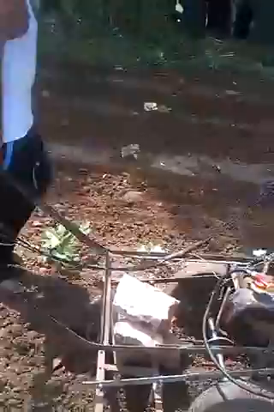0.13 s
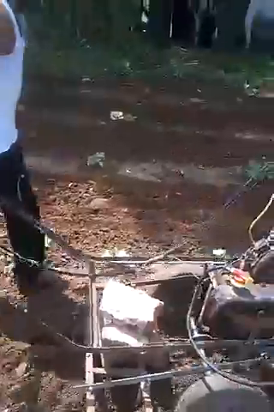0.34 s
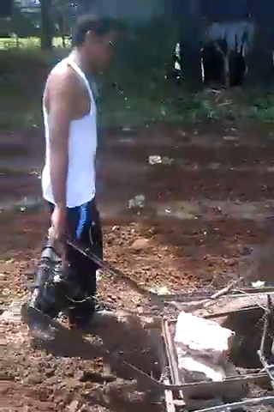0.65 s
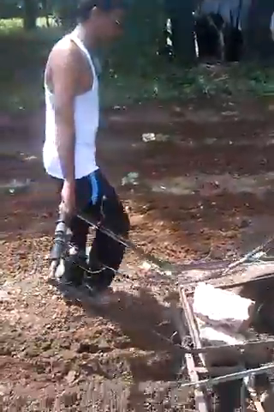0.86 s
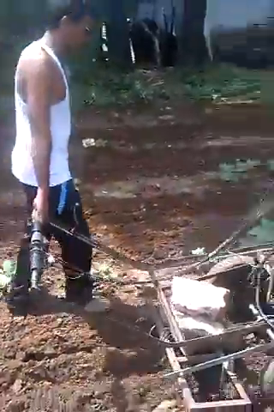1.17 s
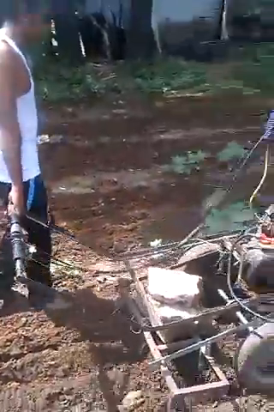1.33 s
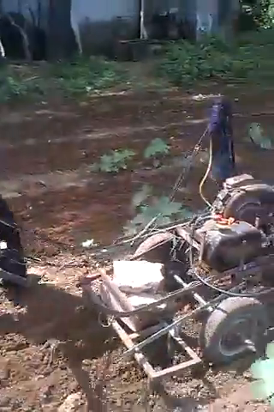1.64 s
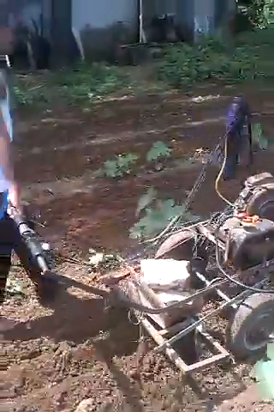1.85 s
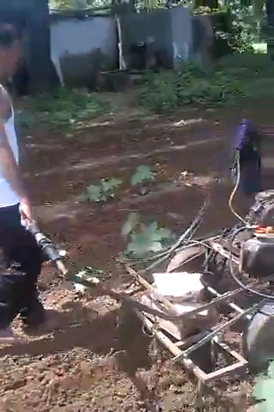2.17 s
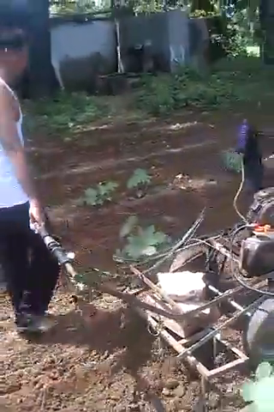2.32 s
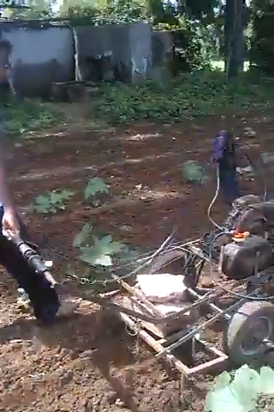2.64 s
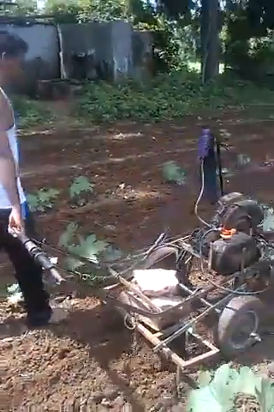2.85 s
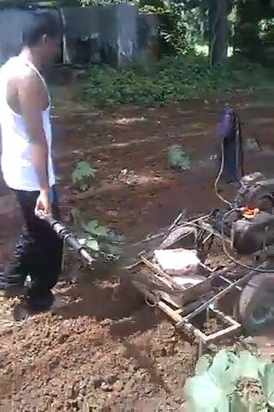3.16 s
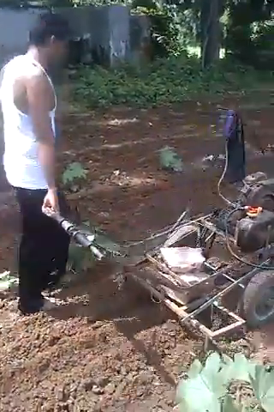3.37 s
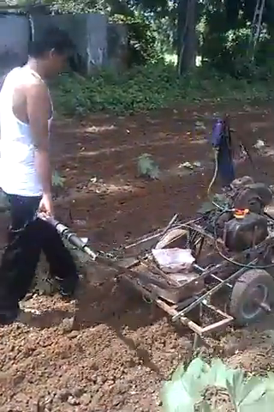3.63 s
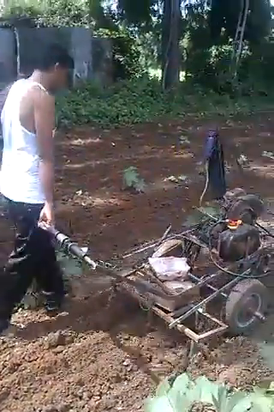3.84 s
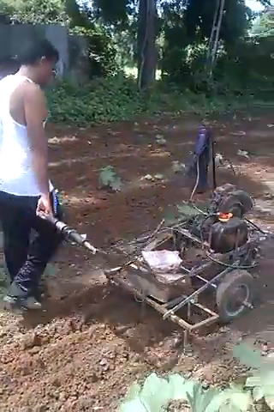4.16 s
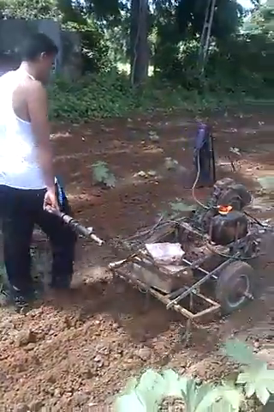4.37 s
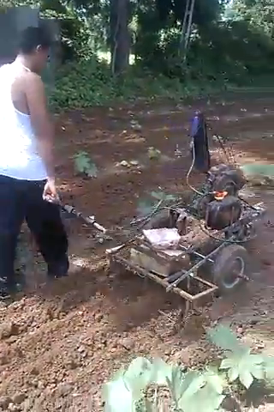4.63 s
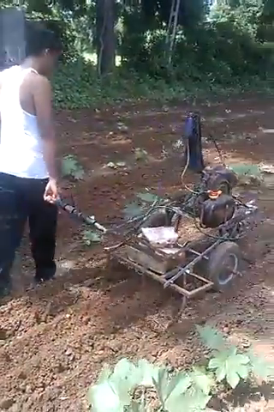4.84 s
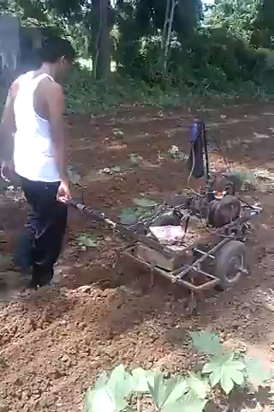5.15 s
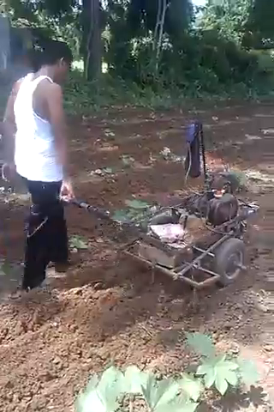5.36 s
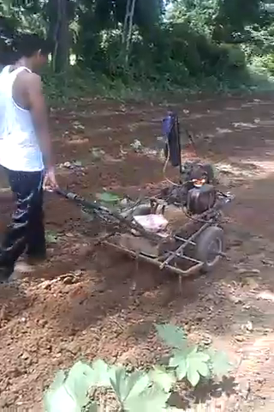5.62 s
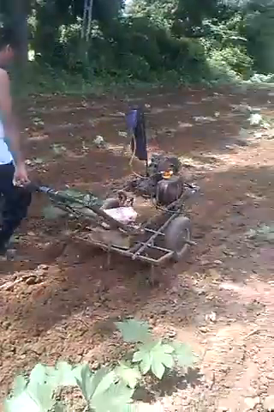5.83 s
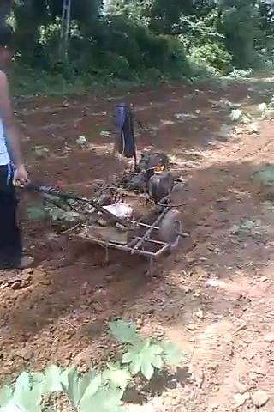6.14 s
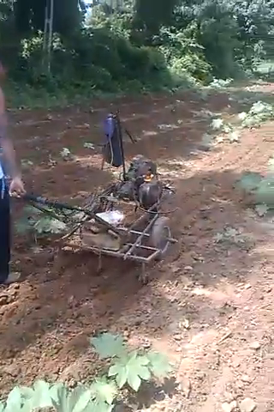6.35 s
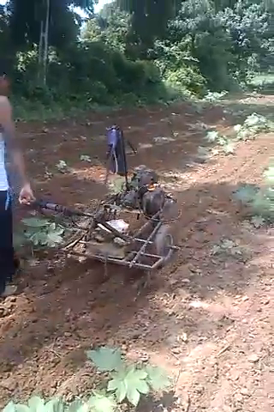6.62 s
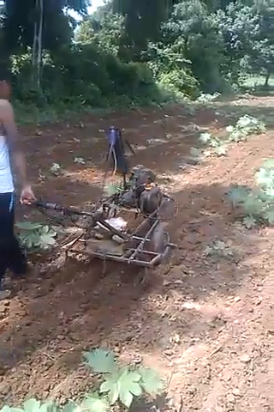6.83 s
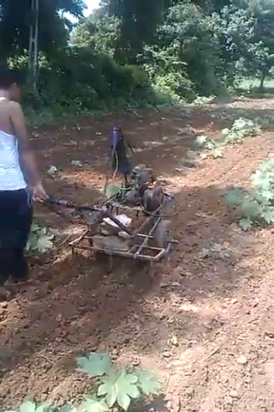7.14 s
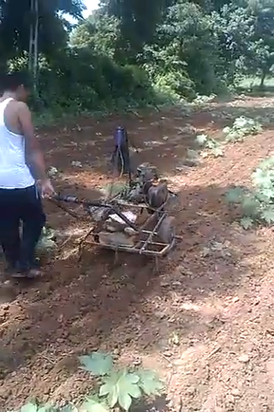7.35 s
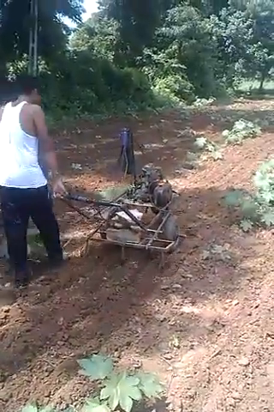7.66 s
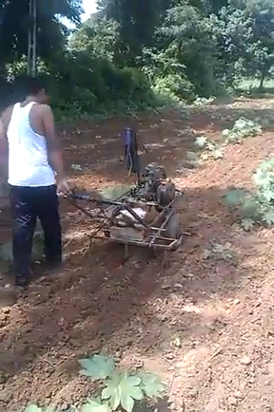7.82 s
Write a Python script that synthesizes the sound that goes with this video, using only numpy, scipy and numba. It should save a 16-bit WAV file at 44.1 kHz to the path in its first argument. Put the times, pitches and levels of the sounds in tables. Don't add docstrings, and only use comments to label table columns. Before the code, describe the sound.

A small single-cylinder engine chugs and clatters outdoors, then a finger rubs over the microphone with a loud thump, leaving it muffled and faint.

```python
import sys
import numpy as np
from scipy import signal
from scipy.fft import rfft, irfft, next_fast_len
from scipy.io import wavfile
from scipy.ndimage import uniform_filter1d
from numba import njit

SR = 44100
rng = np.random.default_rng(int(sys.argv[2]) if len(sys.argv) > 2 else 0)


def generate_wav(sig):
    pcm = np.round(np.clip(np.atleast_2d(sig).T, -1, 1) * 32767).astype(np.int16)
    wavfile.write(sys.argv[1], SR, pcm)


def linear_from_db(decibels):
    return 10 ** (np.asarray(decibels, float) / 20)


N = 352355
T = np.arange(N) / SR

# time_s, turned_cycles
CRANK = [(0.0, 0.56), (0.2, 4.48), (0.6, 12.8), (1.2, 25.68), (1.6, 33.88), (2.2, 47.18), (2.6, 55.5),
         (3.6, 76.15), (4.0, 84.85), (4.2, 89.47), (4.6, 97.75), (5.0, 106.71), (5.4, 114.97),
         (5.6, 119.31), (6.0, 126.91), (6.8, 144.23), (7.6, 160.89), (7.99, 169.03)]
GULP_AT, BANG_AT, TICK_AT, PUSH_AT = .55, .93, .5, .0
# time_s, pitch_hz
HONK_PITCH = [(0, 411), (1.5, 416), (2.4, 416.5), (3.5, 419), (6, 402), (8, 420)]
# time_s, pitch_hz
PIPE_PITCH = [(3.8, 312), (4.7, 314), (4.82, 324), (5.15, 304), (5.45, 318), (5.65, 304), (6.2, 312),
              (6.7, 308), (6.8, 316), (7.0, 304), (7.3, 316), (7.6, 308), (8, 310)]
PIPE_NOTE_SHARE = 1.1
HONK_DB, PIPE_DB, THUMP_DB = -28, -36.5, -34.5
TURN_DB_PER_S = -1.16
CLATTER_DB, DULL_DB = -28.5, -39.5
# frequency_hz, density_db
OPEN_COLOUR = [(280, -10.5), (480, 2.5), (532, -10), (902, -1), (1120, -5), (1440, -5), (1880, -15),
               (2050, -12), (2310, -17), (2830, -10.5), (4090, -15), (5650, -5), (9160, -29),
               (12300, -29.5), (16000, -39)]
# frequency_hz, density_db
COVERED_COLOUR = [(280, -40), (480, 1), (562, -2.5), (695, 6.5), (740, 7), (772, 2.5), (995, 0.5),
                  (1300, -12), (1410, -5.5), (2250, -33.5), (3250, -15), (3890, -26), (6000, -24.5),
                  (7800, -54), (13200, -120)]
# time_s, treble_gain_db
FACING = [(0, 4), (1.42, 2.5), (1.48, 6), (1.98, 6.5), (2.03, 4.5), (2.5, 5)]
# time_s, low_voice_loss_db
SEAL = [(0, 0.5), (2.57, 0), (2.62, -9), (2.69, -13), (2.86, -25.5), (2.98, -24.5), (3.4, -5), (3.8, -11),
        (4.3, -14.5), (5, -14.5), (8, -17.5)]
HONK_SEAL, THUMP_SEAL, DULL_SEAL = 1.29, 0.76, 0.88
SHUT_FROM_S, SHUT_S, SHUT_POWER = 2.42, 0.19, 0.57
SHUT_EDGE_HZ = 2140
# time_s, pitch_hz, level_db
LEAK = [
    (2.5, 1300, -26.5),
    (2.55, 1290, -50),
    (2.6, 1210, -50),
    (2.64, 1500, -42),
    (2.74, 1530, -44),
    (2.77, 1090, -48.5),
    (2.83, 1230, -41.5),
    (2.86, 1200, -57),
]
POCKET_FROM_S, POCKET_TO_S, POCKET_DB, POCKET_AFTER_DB = 3.38, 5.9, -26, -36

# time_s, buzz_hz, level_db (before overload)
SLIDES = [
    [(2.99, 60.4, -41), (3.04, 92, -12), (3.1, 157, -4), (3.115, 341, 8), (3.15, 463, 0.5),
     (3.175, 513, -9.5), (3.19, 700, -20.5), (3.225, 600, -22)],
    [(3.24, 700, -7), (3.285, 409, 0), (3.297, 514, -11.5), (3.31, 702.6, -36.5), (3.33, 500, -34),
     (3.44, 397, -43)],
]
# time_s, rumble_db, crackle_db
GRIP = [(0, -37, -38), (2.5, -38, -43), (2.69, -34.5, -61), (2.98, -38.5, -62.5), (3.3, -36.5, -44.5),
        (4, -40, -47), (5.1, -41.5, -53), (8, -39, -57.5)]
# centre_s, length_s, rumble_db, crackle_db
SHIFTS = [(.47, 0.36, -36, -35), (1.072, 0.065, -26, -32), (1.409, 0.047, -31, -26.5),
          (1.587, 0.21, -29, -32.5), (1.765, 0.061, -29, -25.5), (1.989, 0.094, -31, -33.5),
          (2.113, .06, -24.5, -48), (2.444, 0.071, -26, -41), (2.628, 0.063, -31.5, -32),
          (2.723, 0.14, -32, -58), (2.835, 0.068, -36, -36.5), (2.96, 0.11, -31.5, -60),
          (3.41, .12, -32.5, -29), (3.705, 0.25, -32, -36), (4.018, 0.14, -35.5, -36),
          (4.18, .06, -39, -40), (4.447, 0.092, -34.5, -49), (4.651, 0.18, -33.5, -45.5),
          (4.979, 0.055, -35.5, -57), (5.225, .1, -38, -64), (5.586, 0.045, -36, -36),
          (5.7, 0.1, -48, -40.5), (5.998, 0.054, -38.5, -44), (6.072, 0.054, -37, -47),
          (6.32, 0.036, -34.5, -55), (6.712, 0.21, -38, -49.5), (7.091, 0.037, -38.5, -48),
          (7.827, 0.034, -30, -54), (7.906, .14, -33.5, -45)]
# frequency_hz, density_db
RUMBLE_COLOUR = [(8.8, -57.5), (15, 1), (70, -7), (107, -14), (173, -22.5), (215, -25.5), (260, -34.5),
                 (340, -87), (570, -120)]
# start_s, length_s, level_db, pitch_hz
SCRAPES = [(1.51, 0.076, -34, 533), (2.614, 0.075, -37, 405), (2.81, 0.049, -49, 400),
           (3.328, 0.12, -29.5, 478), (3.597, 0.11, -33.5, 420), (3.7, 0.071, -55, 344),
           (3.95, 0.13, -41, 480), (4.165, 0.027, -38.5, 387), (4.651, 0.24, -49, 485),
           (5.55, .05, -36.5, 450), (5.678, 0.033, -38.5, 460), (6.057, 0.016, -46, 500),
           (6.229, 0.03, -42.5, 550), (6.382, 0.083, -48, 550), (6.657, 0.071, -50, 685),
           (7.877, 0.042, -37, 476), (7.902, 0.046, -37.5, 403)]
BRUSH_S, BRUSH_LENGTH_S, BRUSH_DB = 6.69, 0.023, -57
# time_s, peak_db, pitch_hz, direction
THUDS = [(0.365, -15, 293, -1), (0.43, -28, 290, -1), (0.53, -16, 179, 1), (1.074, -15.5, 157, -1),
         (1.417, -27, 166, 1), (1.531, -4, 308, 1), (1.568, -11.5, 317, -1), (1.6, -6.5, 367, -1),
         (1.623, -9.5, 393, -1), (1.638, -15, 298, 1), (1.763, -11, 216, 1), (2.094, -19, 132, 1),
         (3.58, -18, 312, -1), (3.632, -20, 339, -1), (3.653, -22.5, 105, -1), (3.964, -11.5, 200, -1),
         (4.026, -20, 200, 1), (4.058, -21, 222, -1), (4.422, -27, 91, 1), (4.464, -22, 104, -1),
         (4.665, -19, 103, -1), (5.563, -18, 175, -1), (6.062, -28, 157, -1), (6.239, -31, 213, -1),
         (6.751, -31, 119, -1), (7.096, -27, 98, -1), (7.82, -25.5, 141, -1), (7.887, -21.5, 157, 1),
         (7.933, -19, 135, 1), (7.955, -24, 134, 1)]
RING_S, FIRM_PER_DB = 0.022, 0.4
# centre_s, width_s, peak
PRESSES = [
    (2.665, .009, -.1),
    (2.942, .016, .13),
    (3.013, .003, .5),
    (3.027, .008, -.62),
    (3.051, .003, -.4),
]
# time_s, peak, pull_s, rebound_share
TICKS = [
    (3.3463, .1, .0002, .1),
    (3.3505, .58, .00022, .2),
    (3.4028, .47, .0004, .1),
    (3.4041, .5, .00008, .65),
    (3.41, .05, .00015, .1),
]

# frequency_hz, density_db
HISS_COLOUR = [(600, -4.5), (1500, 6), (4000, -2.5), (9000, -4.5), (15500, -7.5), (16000, -13.5)]
HISS_DB = -65
OVERLOAD = .72
GATE_EDGES_HZ = [2200, 3200, 4400, 5600, 6900, 8300, 9600, 11000, 12400, 13800, 15000, 15900]
GATE_DB, GATE_DB_PER_OCTAVE, RAGGED_DB, FAINT_DB = 2.2, 3.2, 1.2, -56
THIN_DB_PER_HZ, THIN_FROM_HZ, THIN_UNTIL_S = -84.5, 8000, 2.45


def unit(x):
    return x / np.sqrt(np.mean(x ** 2))


def along(table):
    s, *columns = np.transpose(table)
    return [np.interp(T, s, c) for c in columns]


def curves(table):
    table = np.array(table, float)
    silent = table[0, 1:] * 0 - 120
    before = np.r_[table[0, 0] - .02, silent]
    after = np.r_[table[-1, 0] + .02, silent]
    return along([before, *table, after])


def noise():
    return rng.standard_normal(N)


def walk(rate):
    k = int(SR / rate)
    held = np.repeat(rng.standard_normal(N // k + 1), k)
    return unit(uniform_filter1d(uniform_filter1d(held, k), k)[:N])


def colour(x, points, lo_hz, hi_hz):
    hz, db = np.transpose(points)
    size = next_fast_len(N)
    f = np.fft.rfftfreq(size, 1 / SR) + 1e-3
    gain_db = np.interp(np.log(f), np.log(hz), db, left=-120, right=-120)
    spectrum = rfft(x, size) * linear_from_db(gain_db)
    inside = (f > lo_hz) & (f < hi_hz)
    rms = np.sqrt(2 * np.sum(np.abs(spectrum[inside]) ** 2)) / N
    return irfft(spectrum, size)[:N] / rms


@njit
def svf(x, hz, width):
    y, b, l = np.empty(len(x)), 0., 0.
    for i in range(len(x)):
        g, k = np.tan(np.pi * hz[i] / SR), width[i] / hz[i]
        v = (b + g * (x[i] - l)) / (1 + g * (g + k))
        b, l, y[i] = 2 * v - b, l + 2 * g * v, k * v
    return y


def band(x, hz, width):
    return svf(x, np.clip(hz + 0 * T, 20, 16000), width + 0 * T)


def engine():
    cycles, = along(CRANK)
    seal_db, = along(SEAL)
    gap = np.clip(1 - (T - SHUT_FROM_S) / SHUT_S, 0, 1)
    out = intake_honk(cycles) * linear_from_db(HONK_DB + TURN_DB_PER_S * T + HONK_SEAL * seal_db)
    out += exhaust(cycles, seal_db)
    out += open_clatter(cycles, gap)
    out += covered_clatter(cycles) * (1 - gap) * linear_from_db(DULL_DB + DULL_SEAL * seal_db)
    return out + leak()


def stroke(cycles, start, rise, decay, scatter_db):
    turn, phase = np.divmod(cycles - start + 2, 1)
    size = linear_from_db(scatter_db * rng.standard_normal(400))[turn.astype(int)]
    return size * (1 - np.exp(-phase / rise)) * np.exp(-phase / decay)


def intake_honk(cycles):
    hz, = along(HONK_PITCH)
    turn, phase = np.divmod(cycles - GULP_AT + 2, 1)
    strength, detune = rng.standard_normal((400, 2))[turn.astype(int)].T
    gulp = np.sin(np.pi * np.clip(phase / .5, 0, 1)) ** 1.5 * linear_from_db(1.2 * strength)
    seconds = phase / np.gradient(cycles) / SR
    tone = np.sin(2 * np.pi * hz * (1 + .025 * detune) * seconds)
    breath = 0.42 * unit(band(noise(), hz, 110))
    return unit(gulp * (tone + breath))


def exhaust(cycles, seal_db):
    push = stroke(cycles, start=PUSH_AT, rise=0.079, decay=0.05, scatter_db=2.5)
    ring = unit(band(band(np.gradient(push), 312, 17), 312, 60))
    ring += .2 * unit(band(noise(), 310, 30))
    note = np.sin(2 * np.pi * np.cumsum(along(PIPE_PITCH)[0]) / SR)
    ring += PIPE_NOTE_SHARE * np.sqrt(2) * note * linear_from_db(1.2 * walk(rate=15))
    thump = unit(band(push, 78, 49)) + 0.73 * unit(band(push, 107.5, 54))
    return unit(ring) * linear_from_db(PIPE_DB + seal_db) + unit(thump) * linear_from_db(THUMP_DB + THUMP_SEAL * seal_db)


def clatter(cycles, bang_db, tick_db, edge_hz, steady_db):
    bang = stroke(cycles, start=BANG_AT, rise=.2, decay=.15, scatter_db=.8) ** 2
    tick = stroke(cycles, start=TICK_AT, rise=.1, decay=.1, scatter_db=1.5) ** 2
    gate = linear_from_db(bang_db) * bang / bang.mean() + linear_from_db(tick_db) * tick / tick.mean()
    bangs = signal.lfilter(*signal.butter(1, edge_hz, "high", fs=SR), gate * noise())
    return bangs + linear_from_db(steady_db * walk(rate=40)) * noise()


def open_clatter(cycles, gap):
    facing_db, = along(FACING)
    rattle = clatter(cycles, bang_db=-4, tick_db=-12, edge_hz=4000, steady_db=1.2)
    clear = colour(rattle, OPEN_COLOUR, 3120, 6200)
    top = signal.sosfilt(signal.butter(3, 6800, "high", fs=SR, output="sos"), clear)
    clear += (linear_from_db(facing_db) - 1) * top
    for _ in range(3):
        clear = band(clear, 100, SHUT_EDGE_HZ / (1.005 - gap))
    return clear * gap ** SHUT_POWER * linear_from_db(CLATTER_DB + 0.22 * facing_db)


def covered_clatter(cycles):
    ahead = clatter(cycles + .09, bang_db=-4, tick_db=-20, edge_hz=300, steady_db=1)
    dull = colour(ahead, COVERED_COLOUR, 450, 1700)
    held = 1 / (1 + np.exp((T - POCKET_TO_S) / .15))
    pocket = (T > POCKET_FROM_S) * (linear_from_db(POCKET_DB) * held + linear_from_db(POCKET_AFTER_DB) * (1 - held))
    return dull + pocket * unit(band(band(ahead, 3420, 450), 3430, 600))


def leak():
    hz, db = curves(LEAK)
    flutter = noise() * linear_from_db(1.6 * walk(rate=52))
    return unit(band(band(flutter, hz, 830), hz, 1100)) * linear_from_db(db)


def rub():
    hz, db = curves(SLIDES[0] + SLIDES[1])
    hz = np.clip(hz, 20, None)
    buzz = band(band(noise(), hz, 0.93 * hz), hz, 3.7 * hz) / np.sqrt(hz * np.pi / SR)
    drag = unit(band(band(noise(), 130, 160), 87, 250))
    grit = unit(band(band(noise(), 2000, 4200), 1500, 4000)) * np.clip(hz / 600, 0, 1) ** 2
    return (buzz + 0.61 * drag + linear_from_db(-10.5) * grit) * linear_from_db(db)


def hand():
    return handling() + thuds() + presses() + peeling_ticks()


def grip():
    power = linear_from_db(np.array(along(GRIP))) ** 2
    for s, length, *dbs in SHIFTS:
        span = slice(int((s - length) * SR), int((s + length) * SR))
        swell = np.cos(np.pi / 2 * (T[span] - s) / length) ** 4
        power[:, span] += linear_from_db(np.array(dbs))[:, None] ** 2 * swell
    return np.sqrt(power)


def handling():
    rumble, crackle = grip()
    out = colour(noise() * linear_from_db(2.9 * walk(rate=14)), RUMBLE_COLOUR, 22.5, 110) * rumble
    jerks = rng.random(N) < 700 / SR
    slips = jerks * noise() * linear_from_db(2.0 * rng.exponential(size=N))
    out += unit(band(band(band(slips, 174, 190), 180, 230), 250, 400)) * crackle
    out += scrapes(slips)
    brush = np.exp(-((T - BRUSH_S) / BRUSH_LENGTH_S) ** 2)
    return out + linear_from_db(BRUSH_DB) * brush * unit(band(noise(), 2500, 4000))


def scrapes(slips):
    starts, lengths, dbs, hzs = np.transpose(SCRAPES)
    latest = np.clip(np.searchsorted(starts, T) - 1, 0, None)
    since = (T - starts[latest]) / lengths[latest]
    swell = np.clip(since * 12, 0, 1) * np.exp(-since ** 4)
    effort = np.where(since > 0, swell, 0) * linear_from_db(dbs[latest])
    hz = hzs[latest]
    return effort * unit(band(band(band(slips, hz, 0.49 * hz), hz, 0.81 * hz), hz, 1.5 * hz))


def thuds():
    out = np.zeros(N)
    t = np.arange(-SR // 50, SR // 10) / SR
    for s, db, hz, direction in THUDS:
        t60 = RING_S * linear_from_db(-FIRM_PER_DB * (db + 26))
        swell = np.exp(-(4.9 * t * hz) ** 2)
        decay = np.exp(-np.log(1000) * (np.hypot(t, .001) - .001) / max(t60, .005))
        shape = np.where(t < 0, swell, decay)
        blow = np.sign(direction) * linear_from_db(db) * shape * np.cos(2 * np.pi * hz * t)
        k = int(s * SR) - SR // 50
        out[k:k + len(t)] += blow[:N - k]
    return out


def presses():
    return sum(peak * np.exp(-.5 * ((T - s) / width) ** 2) for s, width, peak in PRESSES)


def peeling_ticks():
    out = np.zeros(N)
    for s, peak, pull_s, rebound in TICKS:
        after = np.clip((T - s) / .0012, 0, 50)
        pull = np.exp(-np.abs((T - s) / pull_s) ** 1.3)
        out += peak * (rebound * np.e * after * np.exp(-after) - pull)
    return out


def hiss():
    return colour(noise(), HISS_COLOUR, 3000, 15000) * linear_from_db(HISS_DB)


def treble_gate(x):
    size, frame = next_fast_len(N), 1024
    f, spectrum = np.fft.rfftfreq(size, 1 / SR), rfft(x, size)
    top_hz = GATE_EDGES_HZ[-1]

    def above(hz):
        return np.clip((f - hz) / 500 + .5, 0, 1)

    def power(y):
        return uniform_filter1d(y ** 2, frame)

    excess = grip()[0] / linear_from_db(along(GRIP)[0])
    faint = power(irfft(spectrum * above(4500), size)[:N]) < linear_from_db(FAINT_DB) ** 2
    out = irfft(spectrum * (f < top_hz), size)[:N]
    for lo, hi in zip(GATE_EDGES_HZ, GATE_EDGES_HZ[1:]):
        slope = above(lo) - above(hi) * (hi < top_hz)
        part = irfft(spectrum * slope * (f < top_hz), size)[:N]
        ragged = np.repeat(linear_from_db(RAGGED_DB * rng.standard_normal(N // frame + 1)), frame)[:N]
        threshold_db = GATE_DB + GATE_DB_PER_OCTAVE * max(np.log2(9000 / lo), 0)
        covered = excess > ragged * linear_from_db(threshold_db)
        limit = (ragged ** 2 * linear_from_db(THIN_DB_PER_HZ)) ** 2 * (hi - lo) * (lo > THIN_FROM_HZ)
        thin = (power(part) < limit) & (T < THIN_UNTIL_S)
        dropped = np.where(faint, covered, thin)
        out -= uniform_filter1d(1. * dropped, size=256) * part
    return out


def scene():
    return (engine() + rub() + hand())[None, :]


def roll_off(x):
    return signal.sosfilt(signal.butter(12, 16540, fs=SR, output="sos"), x)


def record(dry):
    loud = treble_gate(dry[0] + hiss())[None] / OVERLOAD
    squashed = OVERLOAD * loud / (1 + np.abs(loud) ** 6) ** (1 / 6)
    return roll_off(squashed)


dry = scene()
out = record(dry)
generate_wav(out)
```